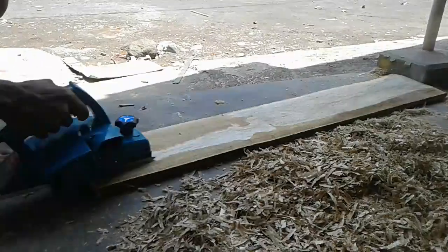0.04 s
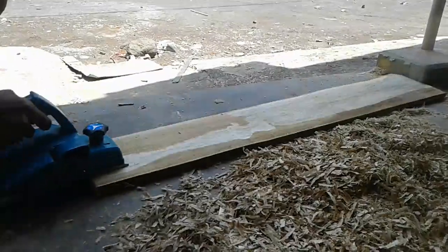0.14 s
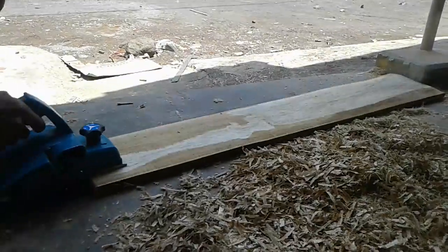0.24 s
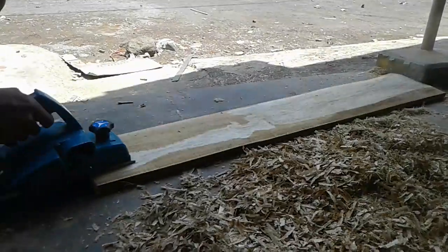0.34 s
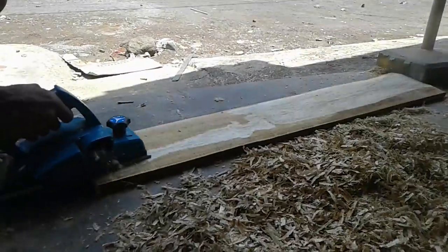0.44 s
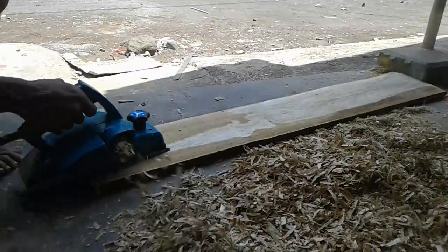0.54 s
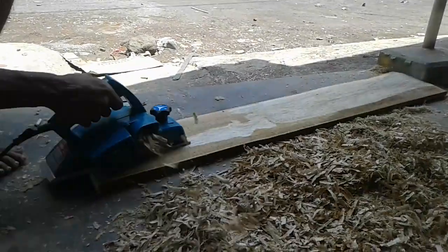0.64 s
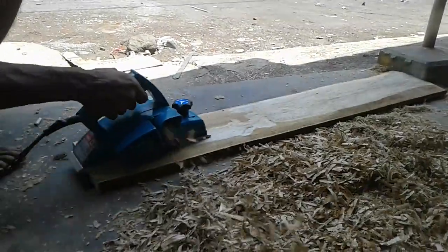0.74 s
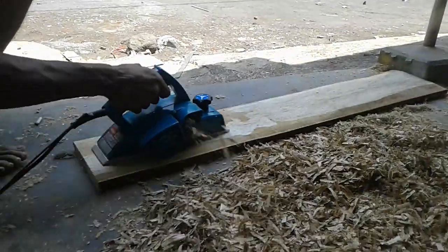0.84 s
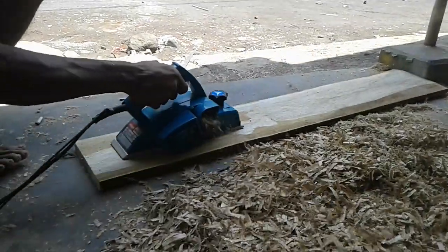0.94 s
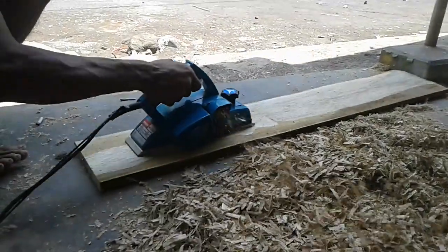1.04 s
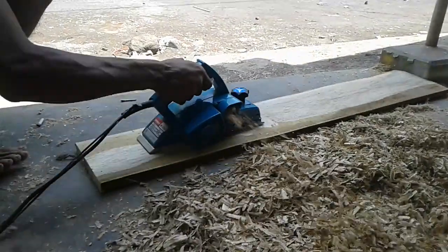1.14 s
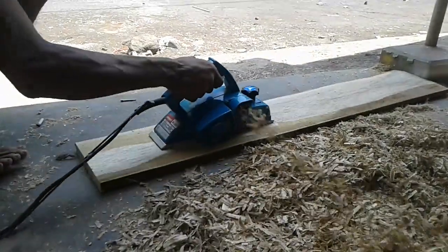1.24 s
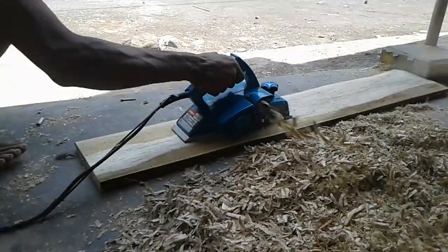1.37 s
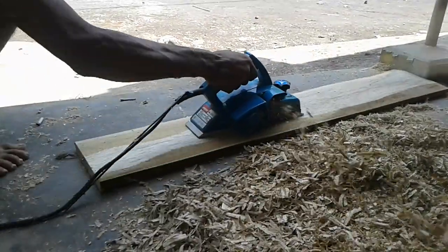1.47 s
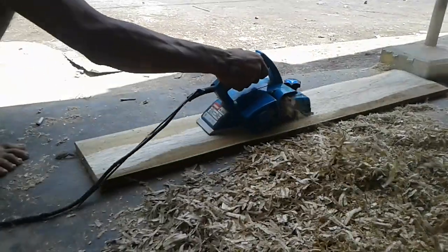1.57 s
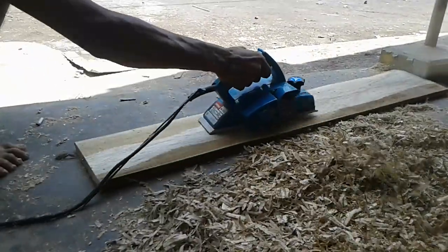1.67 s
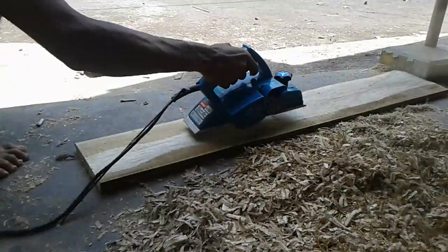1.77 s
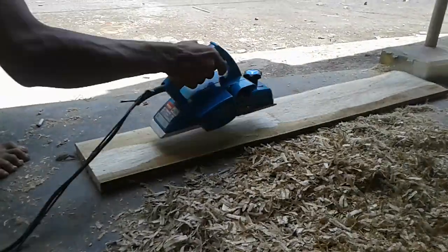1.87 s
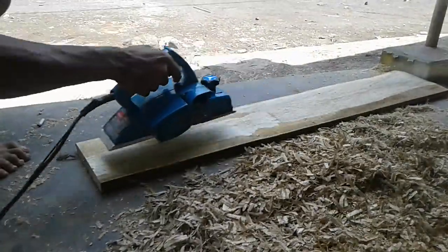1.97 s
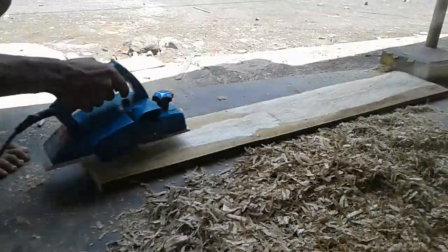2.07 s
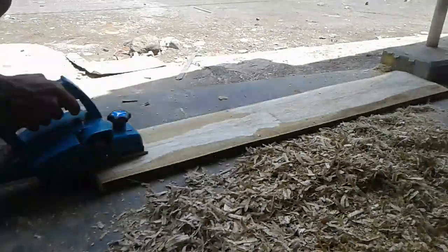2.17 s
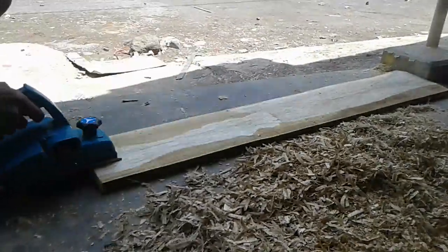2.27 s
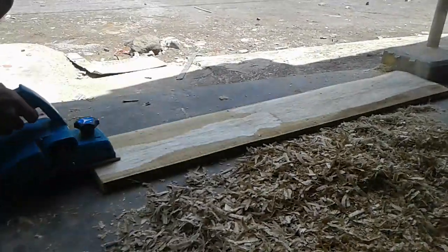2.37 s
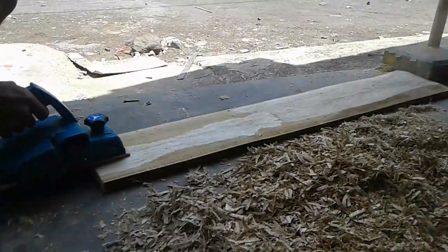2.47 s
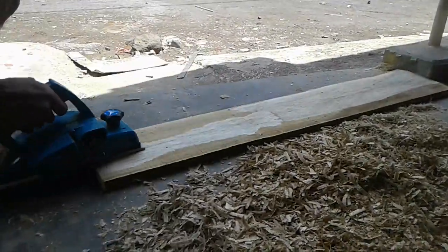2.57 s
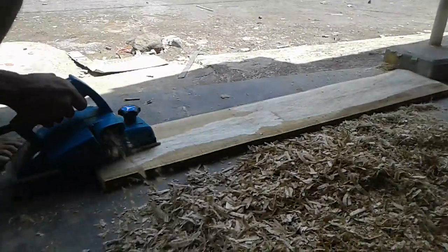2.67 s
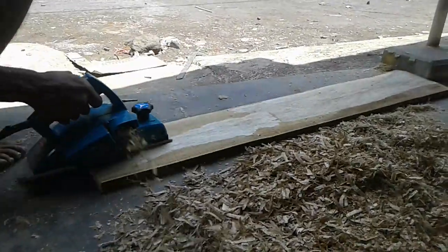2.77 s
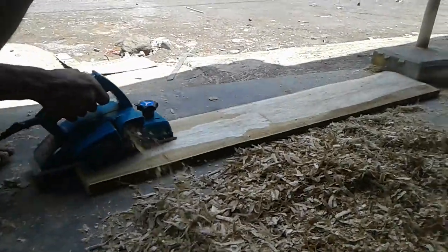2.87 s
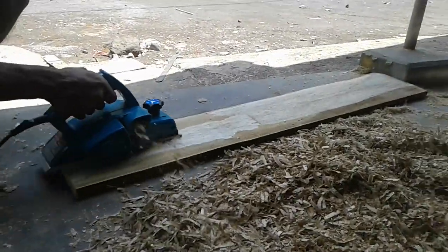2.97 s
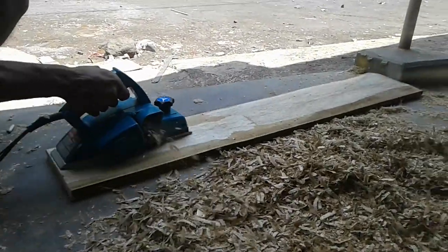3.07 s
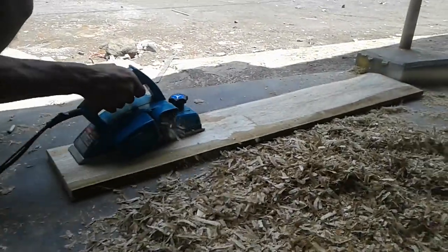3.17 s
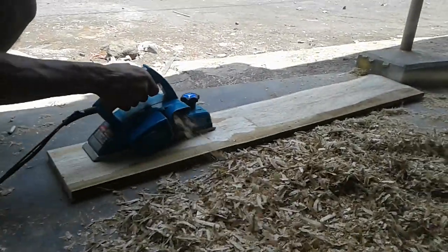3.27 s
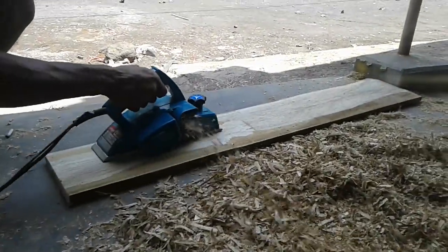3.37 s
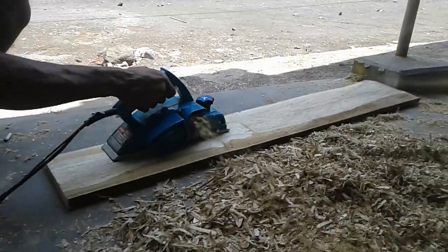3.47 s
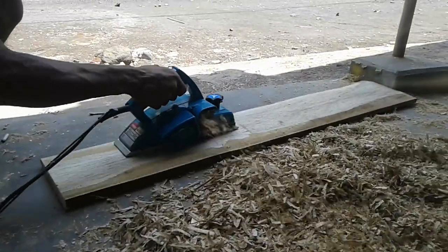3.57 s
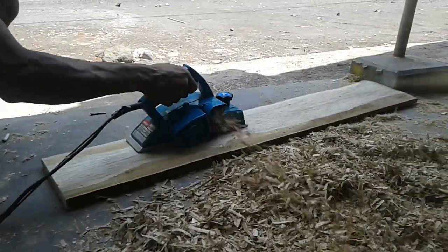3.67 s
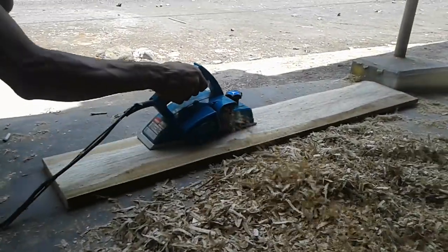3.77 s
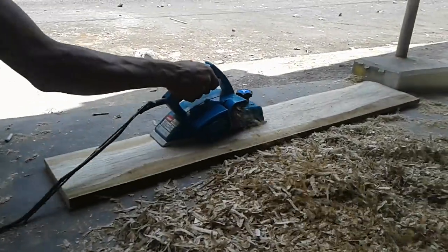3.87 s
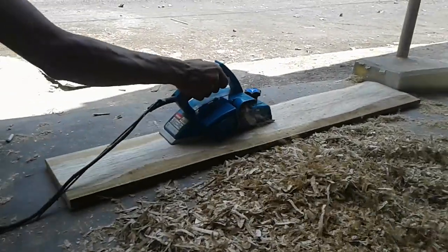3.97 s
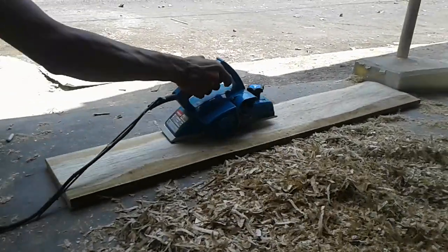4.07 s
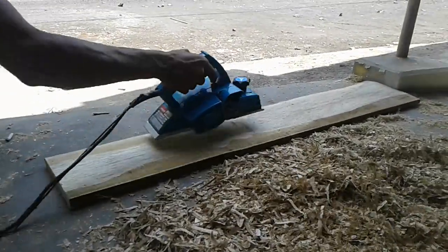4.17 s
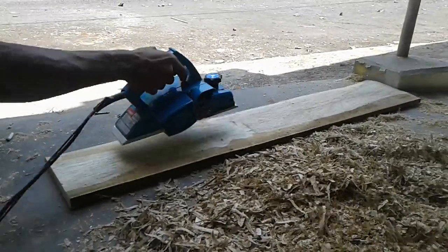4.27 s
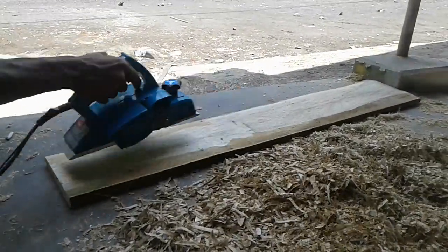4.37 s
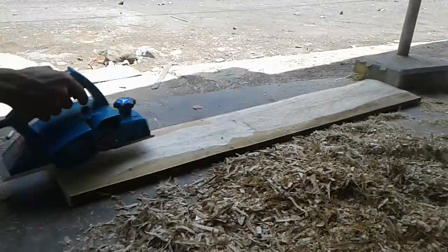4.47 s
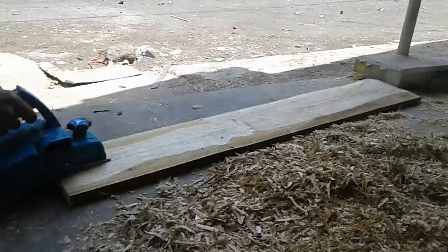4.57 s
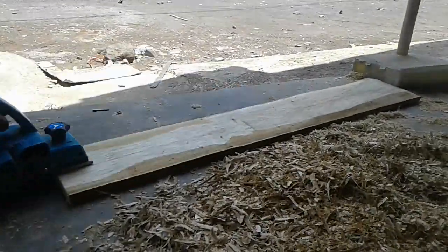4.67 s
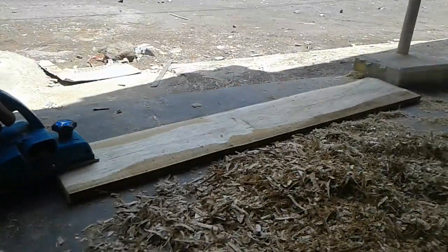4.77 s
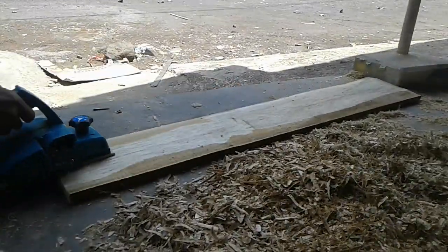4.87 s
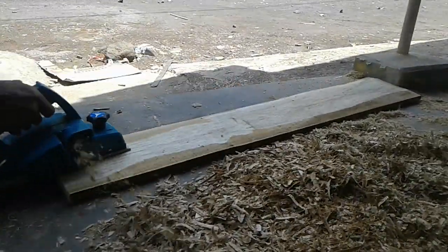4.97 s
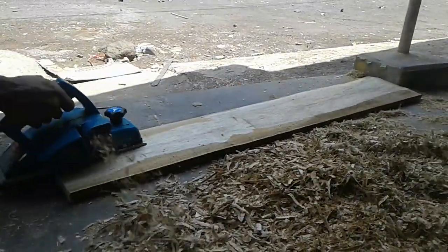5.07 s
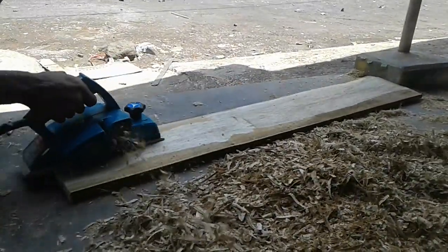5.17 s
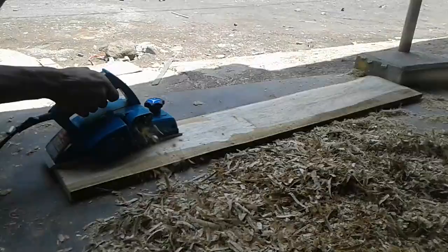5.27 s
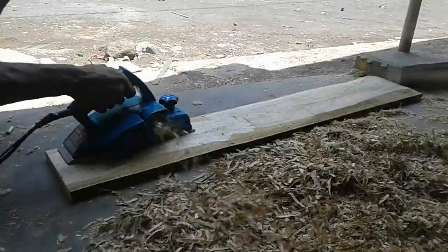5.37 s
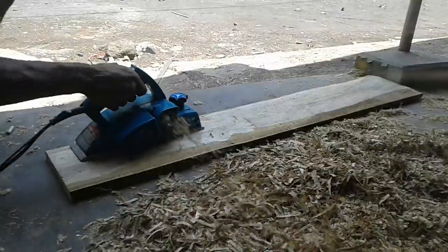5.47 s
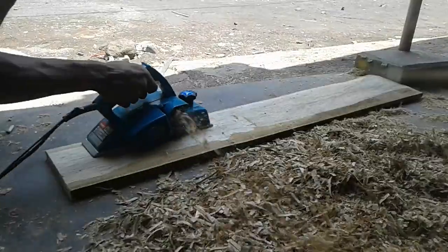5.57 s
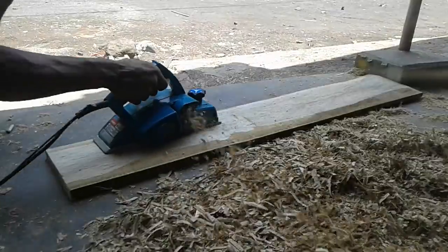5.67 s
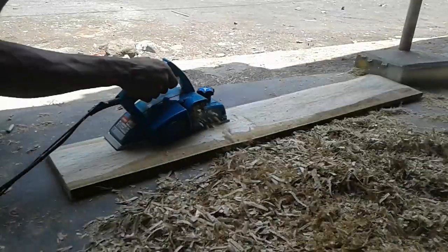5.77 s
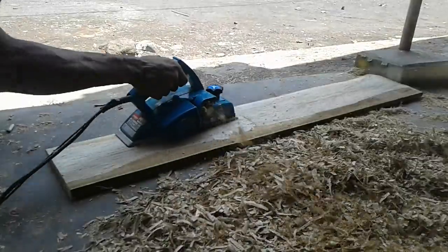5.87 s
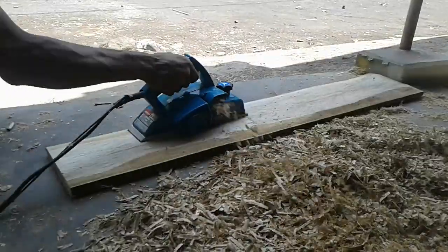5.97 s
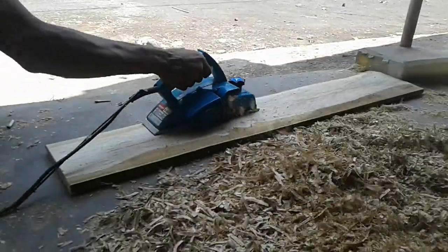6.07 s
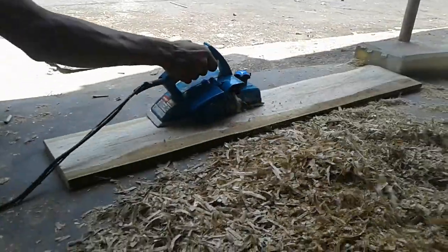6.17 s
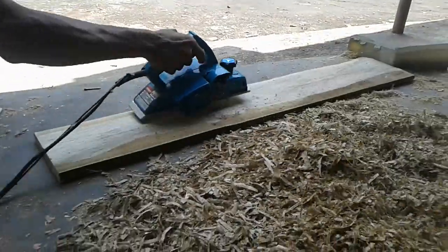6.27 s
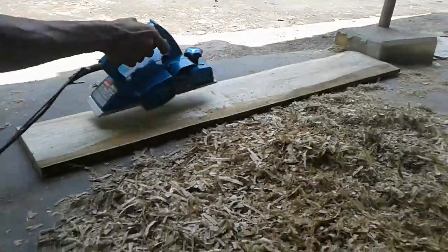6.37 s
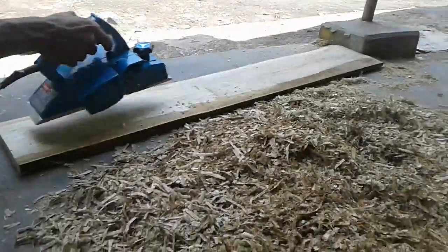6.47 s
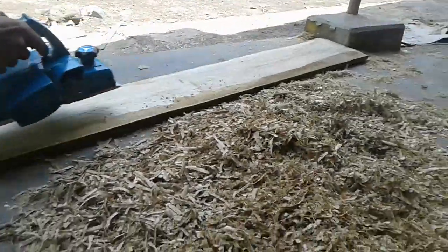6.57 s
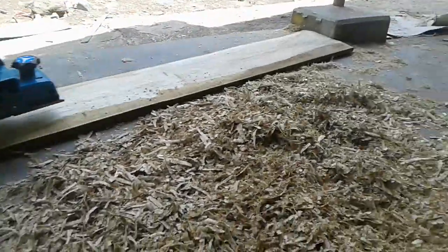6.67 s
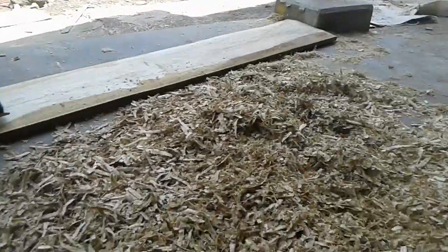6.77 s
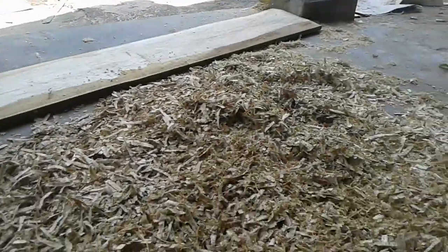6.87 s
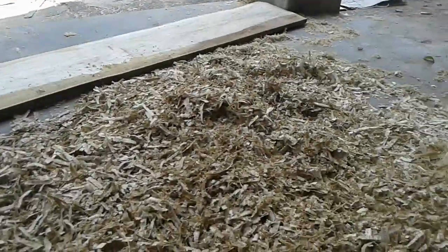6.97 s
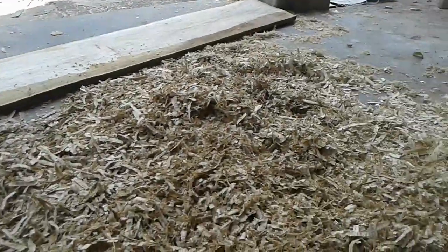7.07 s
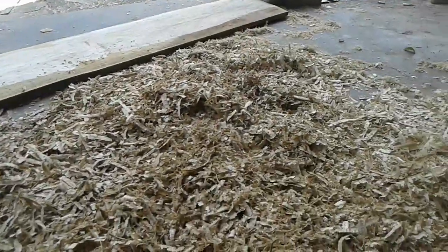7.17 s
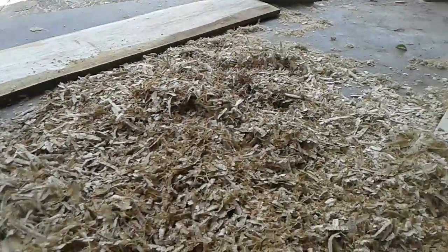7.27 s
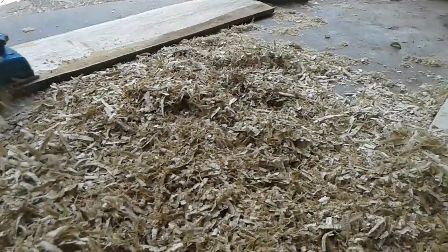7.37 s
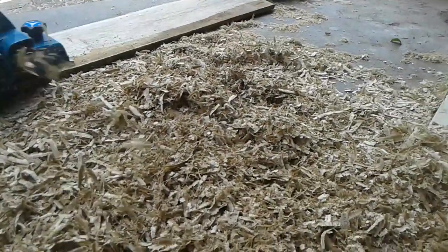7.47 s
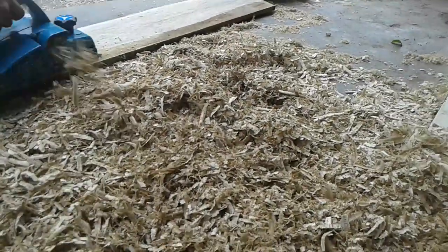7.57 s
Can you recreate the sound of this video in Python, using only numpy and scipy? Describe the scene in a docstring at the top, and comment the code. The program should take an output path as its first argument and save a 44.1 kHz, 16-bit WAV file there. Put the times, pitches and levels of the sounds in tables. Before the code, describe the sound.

After a third of a second of silence, an electric planer coasts quietly, races up with a rough whistle and bites into a board. Four loud, rasping passes follow, each starting hard, ringing the plank and sagging in pitch under load. Between them the motor hums and whirs with a thin whistle; the sole scrapes briefly before the second and third passes. Close microphone on an open concrete porch, a distant engine droning behind.

```python
"""An engine drones some way off throughout, and after a brief silence an electric hand planer is heard coasting.
It races up with a loud, rough whistle, then makes four passes along a board on a concrete porch floor.
In each, drum knives strike the wood as impulses; the plank rings, fibres tear, chips spray and the drum bogs down.
Between passes it coasts, humming, with a thin whistle; the sole is dragged into place before passes two and three.
The fourth pass is still cutting at the end."""
import sys
import numpy as np
from scipy import signal
from scipy.fft import rfft, irfft, next_fast_len
from scipy.io import wavfile
from scipy.ndimage import uniform_filter1d

SR = 44100
rng = np.random.default_rng(int(sys.argv[2]) if len(sys.argv) > 2 else 0)


def unload_audio(sound):
    """Save the sound as a 16-bit wav file, at the path given as the first command line argument."""
    columns = np.transpose(np.atleast_2d(sound))
    # keep every value between -1 and 1, then stretch to whole-number steps
    steps = np.round(np.clip(columns, -1, 1) * 32767)
    wavfile.write(sys.argv[1], SR, steps.astype(np.int16))


N = 336394
TIME = np.arange(N) / SR


def from_db(db):
    """Logarithmic level: decibels to amplitude gain."""
    return 10 ** (np.asarray(db) / 20)


def rms_one(x):
    """Normalisation: scale to an effective value of 1."""
    return x / np.sqrt(np.mean(x ** 2) + 1e-20)


def in_time(rows):
    """Linear interpolation: each column of a curve at every sample."""
    t, *columns = np.transpose(rows)
    return [np.interp(TIME, t, column) for column in columns]


def during(spans, ramp_s):
    """Gating: 1 inside the spans, 0 outside, with linear ramps."""
    return sum(np.clip(np.minimum(TIME - on, off - TIME) / ramp_s, 0, 1) for on, off in spans)


def drift(rate):
    """Low-passed noise: a slow random curve of rms 1, with its two-pole corner at rate in Hz."""
    step = 40  # samples between points of the curve
    pole = np.exp(-2 * np.pi * rate * step / SR)
    noise = rng.standard_normal(N // step + 2002)
    slow = signal.lfilter([1], [1, -2 * pole, pole * pole], noise)[2000:]
    return np.interp(np.arange(N) / step, np.arange(len(slow)), rms_one(slow))


def coloured(x, spectrum):
    """Spectral shaping: filter x by a gain curve that falls steeply beyond its ends; rms 1."""
    hz, db = np.transpose(spectrum)
    size = next_fast_len(N + SR // 10)
    f = np.maximum(np.fft.rfftfreq(size, 1 / SR), 1)
    gain = from_db(np.interp(np.log(f), np.log(hz), db))
    gain = gain / (1 + (hz[0] / f) ** 8) / (1 + (f / hz[-1]) ** 8)
    return rms_one(irfft(rfft(x, size) * gain, size)[:N])


def band(x, low, high):
    """Complementary band-pass filtering: neighbouring bands add up without a gap."""
    size = next_fast_len(N + SR // 10)
    f = np.fft.rfftfreq(size, 1 / SR)
    gain = 1 / (1 + (f / high) ** 20) - 1 / (1 + (f / low) ** 20)
    return irfft(rfft(x, size) * gain, size)[:N]


def evened(x, size=1300):
    """Level control: hold the running rms near 1, averaging twice over size samples."""
    power = uniform_filter1d(uniform_filter1d(x * x, size), size)
    return x / np.sqrt(np.maximum(power, 1e-12))


def turns_of(hz):
    """Phase is the integral of frequency: cycles done so far."""
    return np.cumsum(hz) / SR


def tone(turns, multiple, flutter_db, wander):
    """Rotational partial at a multiple of the turn rate, unsteady in level (dB) and phase (rad); rms 1."""
    phase = 2 * np.pi * multiple * turns + wander * drift(33)
    return rms_one(np.sin(phase) * from_db(flutter_db * drift(13.7)))


# far engine: t/s, frequency of the fifth firing harmonic f/Hz, level/dB
ENGINE = [(1.9, 127.6, -59), (2.09, 133.9, -42), (2.2, 129.9, -38.5), (2.3, 137.8, -49), (2.5, 127, -45),
          (2.68, 146.0, -47), (2.85, 133.9, -45.5), (4.02, 142.2, -39.5), (4.56, 145.9, -45.5),
          (5.77, 147, -39), (6.41, 148.6, -38), (7.11, 147.9, -31.5), (7.44, 144, -35.5),
          (7.62, 145.3, -27)]
# its harmonics: multiple of the firing rate, level/dB against the fifth
ENGINE_ORDERS = [(2, -27), (3, -24), (4, -12), (5, 0), (6, -13), (7, -21), (8, -22.5), (9, -16.5)]
# outdoor rumble: f/Hz, relative level/dB per Hz
RUMBLE_COLOUR = [(25, -26), (45, -17), (70, -5.5), (100, -17), (140, 6.5), (220, -3), (320, -5),
                 (600, -3.5)]


def far_engine():
    """Propagation loss: only low firing harmonics carry this far, over a dull outdoor rumble."""
    fifth_hz, level_db = in_time(ENGINE)
    firings = turns_of(fifth_hz / 5)
    drone = sum(from_db(db) * tone(firings, k, flutter_db=1.4, wander=0.091) for k, db in ENGINE_ORDERS)
    rumble = from_db(-45.0) * coloured(rng.standard_normal(N), RUMBLE_COLOUR)
    return from_db(level_db) * drone + rumble


# passes along the board: knives bite t/s, sole lifts t/s, level/dB,
# then extra rasp level/dB, extra edge level/dB, extra spray level/dB, extra thump level/dB
PASSES = [(.527, 1.712, 1, -4, 0, 0, -1.5), (2.672, 4.105, 0.5, -1.5, -0.5, 0.5, -1.5),
          (4.955, 6.228, 0, 0.5, -0.5, 1.5, 6.5), (7.132, 7.7, -1, 5, 0.5, 3.5, 10)]


def pass_age():
    """Event timing: index of the latest pass and seconds since its knives bit."""
    bites = np.array(PASSES)[:, 0]
    which = np.maximum(np.searchsorted(bites, TIME) - 1, 0)
    return which, np.maximum(TIME - bites[which], 0)


# trigger released, the motor coasts: from t/s, to t/s, initial rotation rate f/Hz
COASTS = [(.3, .41, 181.5), (1.775, 2.48, 201.0), (4.14, 4.835, 202.6), (6.27, 7.1, 200.0)]
# drum speed under load, one curve a pass: t/s, rotation rate f/Hz
LOADED_SPEED = [
    [(0.53, 202.8), (0.582, 201.4), (0.662, 201.4), (0.914, 210.4), (1.0, 211.3), (1.152, 206.4),
     (1.222, 202.6), (1.398, 189.7), (1.444, 188.6), (1.632, 190.1), (1.696, 182.6), (1.72, 184.5)],
    [(2.68, 208.8), (2.758, 205.2), (2.818, 204.3), (2.928, 204.2), (3.058, 209.4), (3.248, 215.7),
     (3.534, 200.1), (3.632, 192.1), (3.692, 185.6), (3.762, 181.7), (3.922, 189.6), (4.024, 191.0),
     (4.1, 195.3)],
    [(4.97, 200.1), (5.08, 192.7), (5.338, 195.8), (5.408, 194.9), (5.488, 190.8), (5.696, 183.9),
     (5.752, 179.6), (5.892, 163.6), (5.95, 160.4), (6.0, 161.0), (6.08, 169.0), (6.152, 181.6),
     (6.22, 192.8)],
    [(7.14, 171.0), (7.344, 183.6), (7.448, 192.7), (7.51, 194.0), (7.582, 189.3), (7.62, 185.6)],
]
# time constants of coasting and racing up (s); speed approached without load (turns per s)
COAST_S, SPIN_UP_S, FREE_SPEED = 3.8, .13, 216


def drum_speed():
    """Rotor dynamics: exponential run-down and run-up, then speed follows the load of the cut."""
    points = []
    for (start, pulled, first), loaded in zip(COASTS, LOADED_SPEED):
        for t in np.linspace(start, pulled, 10):
            points.append((t, first * np.exp((start - t) / COAST_S)))
        shortfall = FREE_SPEED - points[-1][1]
        for t in np.arange(pulled, loaded[0][0] - .035, .01)[1:]:
            points.append((t, FREE_SPEED - shortfall * np.exp((pulled - t) / SPIN_UP_S)))
        points += list(loaded)
    return in_time(points)[0]


USUAL_SPEED = 195  # turns per s, reference for hum and thump
# air pushed by the two knives: dB at the usual speed, rise in dB per turn/s
HUM_DB, HUM_DB_PER_SPEED = -34, 0.1547
# weaker tones of the drum: multiple of the turn rate, level/dB against the knife hum
DRUM_ORDERS = [(1, -19), (3, -23.5), (4, -8.5), (5, -33), (7, -18), (9, -46), (10, -16), (11, -43),
               (12, -18), (13, -48), (14, -21), (16, -37)]
# motor whine, faint where its echo off the floor cancels it: f/Hz, level/dB
WHINE = [(960, -46), (1020, -38.5), (1050, -41), (1068, -46.5), (1100, -37.5), (1160, -36), (1230, -30),
         (1300, -35), (1360, -42), (1440, -48), (1520, -52), (1600, -46), (1720, -56)]
# resonance lifting the drum's eighth harmonic at low speed: centre f/Hz, width f/Hz, peak level/dB
COVER_MODE = (1337, 105, -41.5)
# rush of the fan: f/Hz, relative level/dB per Hz
AIR_COLOUR = [(250, 2.5), (450, 9), (800, 9), (1400, 3), (1900, 4), (2600, -1.5), (3300, 1), (4100, 1),
              (5000, -5.5), (5800, -17.5), (7200, -16.5), (10000, -21), (15500, -24.5)]


def machine(turns, speed, power, contact):
    """Aerodynamic and rotational noise: knives chop the air, the belt-driven motor whines, its fan rushes."""
    hum_gain = from_db(HUM_DB + HUM_DB_PER_SPEED * (speed - USUAL_SPEED))
    drum = tone(turns, 2, flutter_db=2.0, wander=0.21)
    drum = drum + sum(from_db(db) * tone(turns, k, flutter_db=4.0, wander=0.13) for k, db in DRUM_ORDERS)
    whine_db = np.interp(6 * speed, *np.transpose(WHINE)) - 4 * contact
    whine = from_db(whine_db) * tone(turns, 6, flutter_db=.9, wander=.2)
    centre_hz, width_hz, peak_db = COVER_MODE
    cover_gain = from_db(peak_db) / np.hypot(1, 2 * (8 * speed - centre_hz) / width_hz)
    cover = cover_gain * tone(turns, 8, flutter_db=.9, wander=.2)
    air_gain = (speed / speed.mean()) ** 0.5 * from_db(-41 + 3.36 * power + 0.6 * drift(30))
    air = air_gain * coloured(rng.standard_normal(N), AIR_COLOUR)
    return hum_gain * drum + whine + cover + air


SLOT_ORDER = 21.2  # armature slots passing per turn of the drum
RIPPLE_HZ = 100  # torque ripples at twice the mains rate
# resonance of the motor housing: centre f/Hz, width f/Hz, boost level/dB
HOUSING = (4080, 480, 8.0)
# how far (dB) and how fast (s) the load of the cut quietens the whistle
SMOTHERED_DB, SMOTHER_S = -13, 0.17


def whistle(turns, speed, power, contact):
    """Slot-passing tone: thin when coasting; under power it is rippled and resonant, with brush fizz."""
    ripple = 1 + .45 * np.sin(2 * np.pi * RIPPLE_HZ * TIME)
    centre_hz, width_hz, boost_db = HOUSING
    housing = from_db(boost_db / (1 + (2 * (SLOT_ORDER * speed - centre_hz) / width_hz) ** 2))
    coasting = from_db(-50.0) * tone(turns, SLOT_ORDER, flutter_db=4.0, wander=0.25)
    sparks = tone(turns, SLOT_ORDER, flutter_db=2, wander=.9) * (1 + .5 * drift(220))
    overtone = tone(turns, 2 * SLOT_ORDER, flutter_db=2, wander=2)
    fizz_colour = [(3000, -51), (4100, 14), (5500, -19), (7200, -9), (9000, -19), (15000, -32)]
    brushes = from_db(-44.5) * coloured(rng.standard_normal(N), fizz_colour)
    driven = from_db(-41.5) * housing * sparks + from_db(-68.0) * overtone + brushes
    # it lingers for a moment after the bite, until the load smothers it
    load = contact * np.minimum(pass_age()[1] / SMOTHER_S, 1)
    return coasting + power * from_db(SMOTHERED_DB * load) * ripple * driven


# sole set down and dragged into place: from t/s, to t/s, level/dB
DRAGS = [(2.144, 2.32, -46), (2.33, 2.477, -49), (4.55, 4.662, -45), (4.673, 4.86, -48.5)]
# its friction noise: f/Hz, relative level/dB per Hz
DRAG_COLOUR = [(70, 11), (300, -38), (900, -9), (2500, -34), (3400, -3), (4000, 9), (4500, -1), (5500, -22),
               (9000, -19)]


def dragging():
    """Friction noise: the metal sole rubs over the wood and rings the housing."""
    pressure = sum(from_db(db) * during([(on, off)], ramp_s=0.018) for on, off, db in DRAGS)
    rubbing = rng.standard_normal(N) * from_db(3.2 * drift(60))
    return pressure * coloured(rubbing, DRAG_COLOUR)


# plank modes excited by harmonics of the knife blows: centre f/Hz, width f/Hz, level/dB
PLANK_MODES = [(547, 17, -34.5), (736, 90, -36.5), (842.6, 22, -31.5), (938, 21, -30), (1156, 10, -34),
               (1249, 12, -33), (1416, 12, -30), (1897, 76, -34.5)]
# squeals, one harmonic locked to the plank: from t/s, to t/s, multiple of the turn rate, level/dB
SQUEALS = [(0.51, 0.692, 6, -26.5), (0.842, 1.16, 4, -45), (1.38, 1.49, 4, -26.5), (1.39, 1.74, 5, -32),
           (1.027, 1.16, 15, -28), (2.696, 2.783, 13, -23.5), (2.76, 3.02, 6, -30.5),
           (3.045, 3.402, 4, -36), (3.402, 3.56, 6, -39.5), (3.529, 3.842, 3, -30), (3.851, 4.065, 6, -29),
           (4.035, 4.132, 4, -26), (4.95, 5.067, 6, -25), (5.044, 5.63, 10, -29), (5.2, 5.47, 6, -28.5),
           (5.677, 5.81, 3, -35), (5.99, 6.14, 5, -32.5), (7.14, 7.234, 6, -22.5), (7.135, 7.215, 10, -23),
           (7.24, 7.371, 5, -23), (7.462, 7.624, 14, -26)]


def singing(turns, speed):
    """Resonance: plank modes swell as knife harmonics slide through them; now and then one squeals."""
    out = 0
    for k in range(3, 17):
        gain = sum(from_db(db) / (1 + (2 * (k * speed - hz) / width) ** 2) for hz, width, db in PLANK_MODES)
        for on, off, multiple, db in SQUEALS:
            if multiple == k:
                gain = gain + from_db(db) * during([(on, off)], ramp_s=0.05)
        out = out + gain * tone(turns, k, flutter_db=1.86, wander=0.11)
    return out


# the sole bounces on the wood: middle t/s, length t/s, chatter amount (0-1)
BOUNCES = [(1.347, 0.23, 0.2), (1.714, 0.19, 0.34), (3.48, 0.23, 0.17), (3.655, .18, 0.3),
           (3.85, 0.085, 0.24), (4.113, 0.099, 0), (5.035, .14, 0.18), (5.83, 0.27, 0.32),
           (6.147, 0.32, 0.53), (7.308, 0.32, 0.25), (7.62, 0.19, 0.3)]
# constant chatter, extra at the bite (both 0-1), decay time of the extra (s)
STEADY_CHATTER, BITE_CHATTER, BITE_CHATTER_S = 0.03, 0.13, 0.049


def chattering(age):
    """Contact instability: the sole shakes briefly as the knives bite, and in each bout of bouncing."""
    bouts = 0
    for middle, length, amount in BOUNCES:
        bouts = bouts + amount * np.cos(np.pi * np.clip((TIME - middle) / length, -.5, .5))
    return np.clip(STEADY_CHATTER + BITE_CHATTER * np.exp(-age / BITE_CHATTER_S) + bouts, 0, 1)


def knife_strikes(turns, chatter, slip_s, uneven_db, second_knife_db):
    """Impulse excitation: the proud knife hits, the other grazes; chatter scatters timing and force."""
    halves = np.arange(1, int(2 * turns[-1]))
    chance = rng.standard_normal((len(halves), 2))
    at = np.interp(halves / 2, turns, np.arange(N))
    rough = chatter[at.astype(int)]
    at = np.clip(at + chance[:, 0] * rough * slip_s * SR, 0, N - 2)
    force = from_db(uneven_db * rough * chance[:, 1] + second_knife_db * (halves % 2))
    # each impulse is shared between the two nearest samples
    whole, part = at.astype(int), at % 1
    return np.bincount(whole, force * (1 - part), N) + np.bincount(whole + 1, force * part, N)


def board(strikes, ring_s, ring_db, evenness, lag_s, size=4400, count=1100):
    """Dispersive reverberation: dense echoes in the plank follow each blow and change along the board."""
    age = np.arange(count) / SR
    # bending waves disperse: 1 kHz arrives after lag_s, the treble sooner
    travel = np.exp(-4j * np.pi * lag_s * np.sqrt(1000 * np.fft.rfftfreq(2 * count, 1 / SR)))
    out = np.zeros(N + 3 * size + 2 * count)
    padded = np.pad(strikes, (size, 2 * size))
    for start in range(0, N + size, size):
        echoes = rng.standard_normal(count) * np.exp(-age / ring_s)
        blow = echoes * from_db(ring_db) / np.linalg.norm(echoes) + (age == 0)
        # the pressed-down sole damps the plank and flattens its peaks and valleys
        spectrum = rfft(np.pad(blow, (count, 0)))
        response = irfft(travel * spectrum / np.abs(spectrum) ** np.clip(evenness, 0, .8))
        # overlapping windows crossfade one stretch of board into the next
        stretch = padded[start:start + 2 * size] * np.hanning(2 * size)
        rung = signal.fftconvolve(stretch, response)
        out[start:start + len(rung)] += rung
    return out[size + count:][:N]


def fibre_tearing(turns):
    """Fracture noise: loudest just after the knife enters, and mostly treble."""
    after_blow = 0.019 + np.exp(-(turns % 1) / 0.42)
    tearing = rng.standard_normal(N) * after_blow * from_db(1.3 * drift(110))
    return coloured(tearing, [(200, -41), (1000, -42), (3000, -14.5), (18000, -25)])


def floor_echo(x, near_s, far_s, share):
    """Comb filtering: the floor echo lags more as a pass goes on, so its treble ridges slide down."""
    lag = np.interp(TIME, np.array(PASSES)[:, :2].ravel(), [near_s, far_s] * len(PASSES))
    return x + share * np.interp(TIME - lag, TIME, x)


# thump before pass level: dB at the usual speed, rise in dB per turn/s, ceiling in dB; build-up (s)
THUMP_DB, THUMP_DB_PER_SPEED, THUMP_TOP_DB, THUMP_BUILDS_S = -44, .6, -33, 0.126


def drum_thump(turns, speed, age, extra_db):
    """Forced vibration: a sine once a turn, building as the sole gets onto the board."""
    db = THUMP_DB + extra_db + THUMP_DB_PER_SPEED * (speed - USUAL_SPEED)
    gain = from_db(np.minimum(db, THUMP_TOP_DB)) * np.minimum(age / THUMP_BUILDS_S, 1) ** 2
    return gain * np.sqrt(2) * np.sin(2 * np.pi * turns)


# filter on the cutting noise: f/Hz, gain level/dB
CUT_COLOUR = [(430, 2.5), (600, -4), (850, -6.5), (1250, 7.5), (2000, 2), (3000, 0.5), (4400, -4),
              (5000, -9), (5700, -24), (6600, -25.5), (8000, -28.5), (9800, -33), (13000, -39),
              (15500, -35)]
# named ranges of the cutting noise: low f/Hz, high f/Hz
ZONES = {"body": (470, 1000), "knock": (1000, 1650), "rasp": (1650, 2800), "edge": (2800, 5500),
         "spray": (5500, 8500), "fizz": (8500, 15500)}
# their levels before pass extras: level/dB at the bite, level/dB further along
ZONE_DB = {"body": (-38, -29), "knock": (-31.5, -30), "rasp": (-31.5, -24.5), "edge": (-30, -26.5),
           "spray": (-44.5, -43.5), "fizz": (-48.5, -59)}
# time over which the wood's ringing and the chip spray make that shift (s)
WOOD_SHIFT_S, SPRAY_SHIFT_S = 0.76, 2.4
# harder blows on the end grain: extra dB at first, Gaussian decay width (s)
END_GRAIN_DB, END_GRAIN_S = 4.5, 0.068
BITE_S, RELEASE_T60_S = 0.029, 0.21  # attack time; time for a 60 dB fall after the sole lifts


def cutting(turns, speed):
    """Impact and fracture sound: knife blows ring the board; fibres tear after each and chips spray out."""
    which, age = pass_age()
    _, lift_s, pass_db, rasp_db, edge_db, spray_db, thump_db = np.array(PASSES)[which].T
    chatter = chattering(age)
    strikes = knife_strikes(turns, chatter, slip_s=.00005, uneven_db=4.0, second_knife_db=-19.5)
    blows = rms_one(board(strikes, ring_s=.0042, ring_db=13, evenness=.22, lag_s=.004, size=3200))
    tearing = fibre_tearing(turns)
    wood = coloured(blows + (.12 + .9 * chatter) * tearing, CUT_COLOUR)
    spray = coloured(blows + (.6 + 1.6 * chatter) * tearing, CUT_COLOUR)
    # chips leave in uneven puffs
    spray = spray * from_db(1.0 * drift(70) + 1.8 * drift(600))
    spray = floor_echo(spray, near_s=.00028, far_s=.00033, share=.3)
    end_grain_db = END_GRAIN_DB * np.exp(-(age / END_GRAIN_S) ** 2 / 2)
    wood_extra_db = {"rasp": rasp_db, "edge": edge_db}
    sound = singing(turns, speed)
    for name, (first_db, later_db) in ZONE_DB.items():
        if name in ("spray", "fizz"):
            source, shift_s, extra_db = spray, SPRAY_SHIFT_S, spray_db
        else:
            source, shift_s = wood, WOOD_SHIFT_S
            extra_db = end_grain_db + wood_extra_db.get(name, 0)
        db = first_db + (later_db - first_db) * np.minimum(age / shift_s, 1) + extra_db
        sound = sound + from_db(db) * evened(band(source, *ZONES[name]))
    thump = drum_thump(turns, speed, age, thump_db)
    # quick bite; the ringing dies away as the sole lifts
    release_db = -60 * np.maximum(TIME - lift_s, 0) / RELEASE_T60_S
    envelope = np.minimum(age / BITE_S, 1) * from_db(pass_db + release_db)
    return envelope * (sound + thump)


def scene():
    """Superposition: the planer close by, the engine behind it."""
    speed = drum_speed() * (1 + 0.000504 * drift(16.5))
    turns = turns_of(speed)
    power = 1 - during([(start - .05, pulled + 0.01) for start, pulled, _ in COASTS], ramp_s=0.025)
    contact = during([(bite, lift + 0.12) for bite, lift, *_ in PASSES], ramp_s=0.01)
    # the whistle swells later than the fan
    racing = 1 - during([(start - .07, pulled + 0.069) for start, pulled, _ in COASTS], ramp_s=0.11)
    motor = machine(turns, speed, power, contact) + whistle(turns, speed, racing, contact)
    return (far_engine() + motor + dragging() + cutting(turns, speed))[None]


START_S = .337  # silence until then
CUTOFF_HZ = 15700  # upper limit of the sound


def record(dry):
    """Saturation and band-limiting: after a short fade-in, peaks are rounded and the top is cut."""
    fade_db = -14 * np.clip(1 - (TIME - START_S) / 0.18, 0, 1)
    opening = (TIME > START_S) * from_db(fade_db)
    rounded = dry / (1 + (dry / .46) ** 6) ** (1 / 6)
    low_pass = signal.ellip(12, .1, 80, CUTOFF_HZ, fs=SR, output="sos")
    return signal.sosfilt(low_pass, rounded * opening)


dry = scene()
out = record(dry)
unload_audio(out)
```